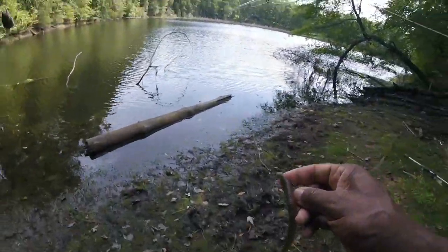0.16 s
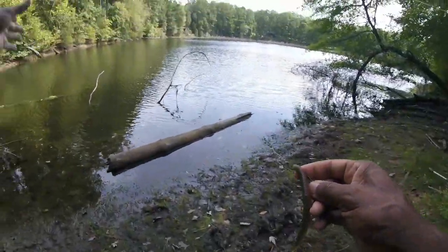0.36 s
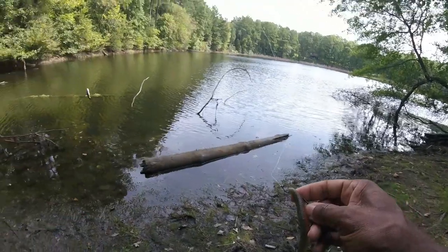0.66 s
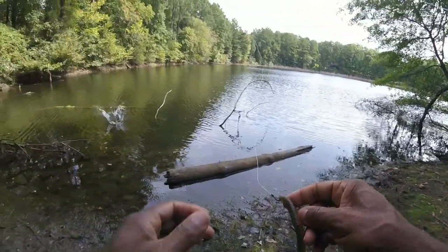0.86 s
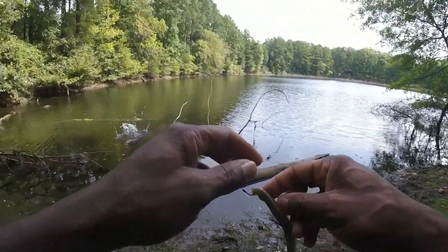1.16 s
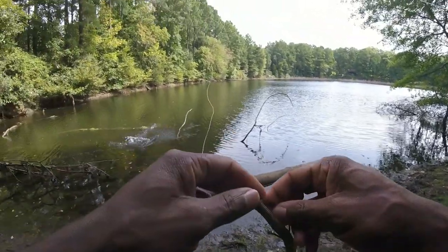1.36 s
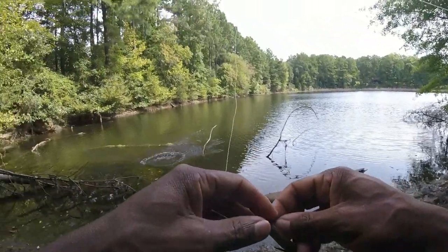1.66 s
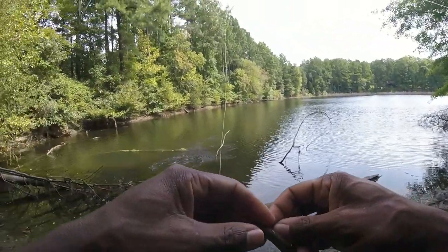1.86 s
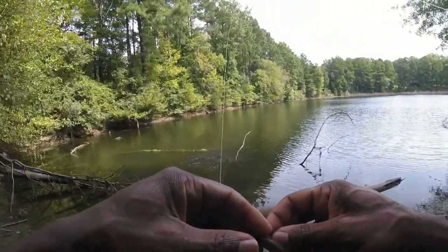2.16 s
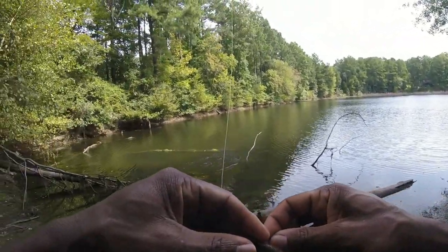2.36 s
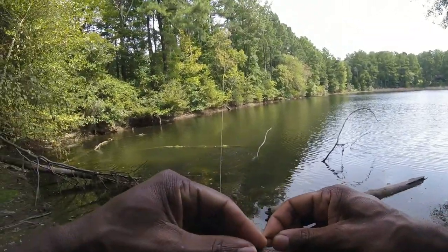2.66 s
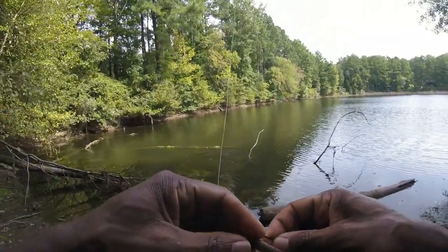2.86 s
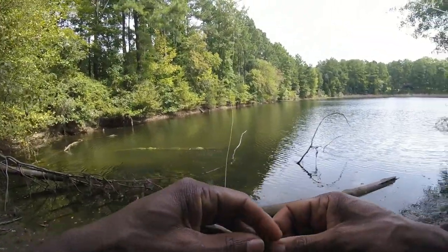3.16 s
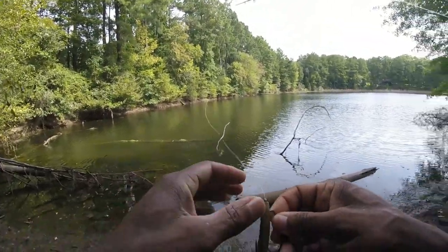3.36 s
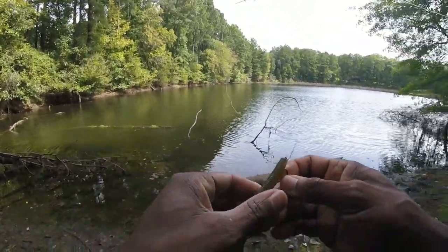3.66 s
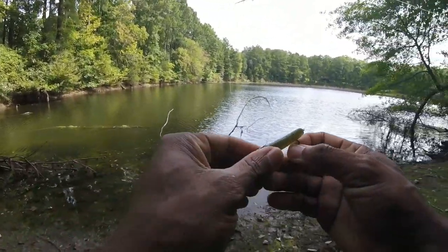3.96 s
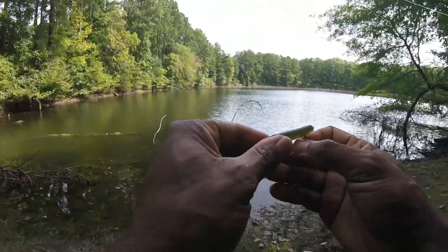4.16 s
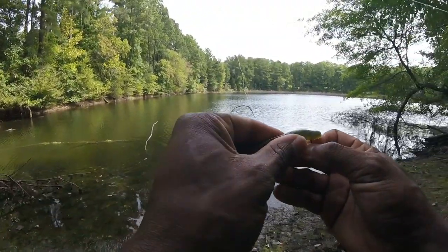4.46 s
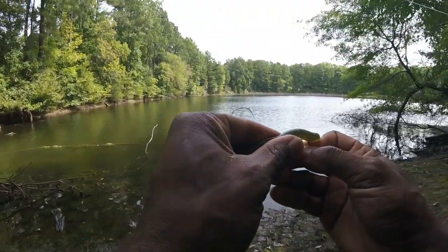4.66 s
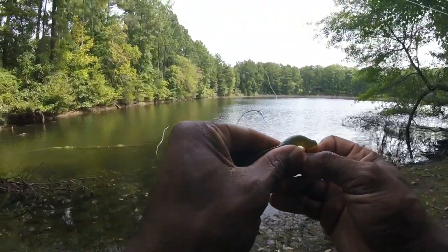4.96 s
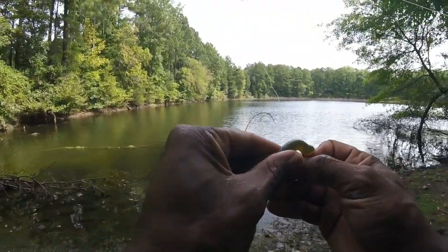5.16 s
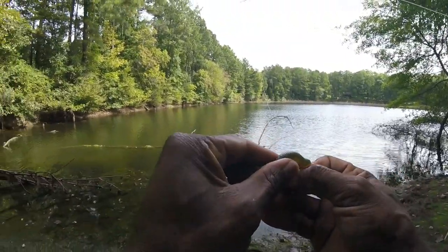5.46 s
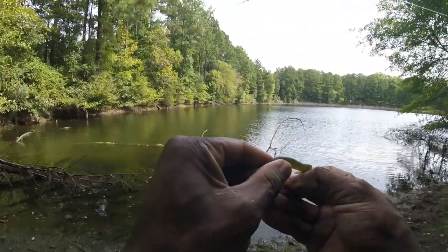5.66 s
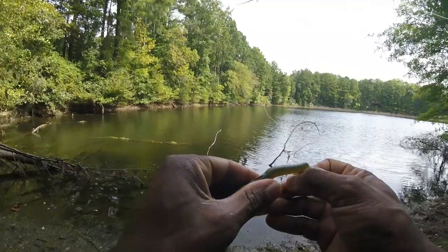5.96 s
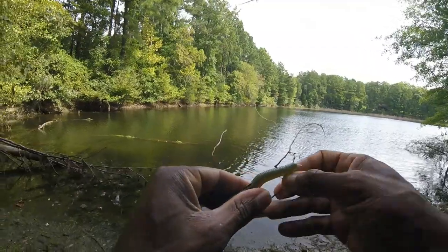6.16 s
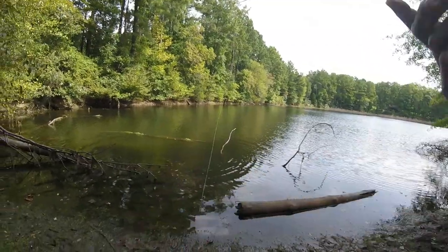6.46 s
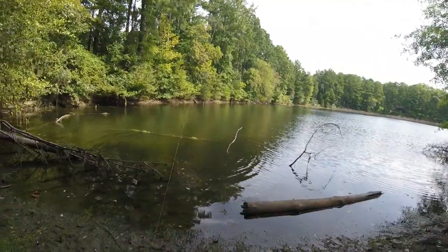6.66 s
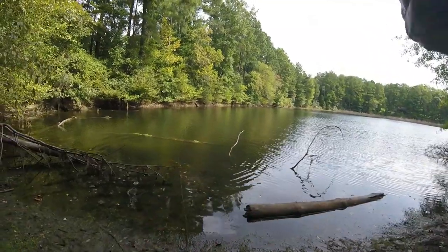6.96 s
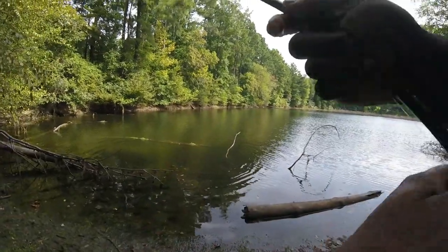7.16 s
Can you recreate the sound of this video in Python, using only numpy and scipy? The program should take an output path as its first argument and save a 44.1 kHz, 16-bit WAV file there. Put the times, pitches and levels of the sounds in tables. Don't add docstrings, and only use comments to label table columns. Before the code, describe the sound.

At a quiet pond, a near cricket pulses about ten times a second over a faint insect chorus, low air rumble and far engine hum. A sleeve swishes, then a short splash smacks with bubbles, pings and falling drops. Light finger ticks follow, with a deep bump. The middle is mostly cricket, then dull thumps strike the chest-worn microphone near the end.

```python
import sys
import numpy as np
from scipy import signal
from scipy.fft import rfft, irfft, next_fast_len
from scipy.io import wavfile
from scipy.ndimage import uniform_filter1d

SR = 44100
rng = np.random.default_rng(int(sys.argv[2]) if len(sys.argv) > 2 else 0)


def amplitude_ratio(level_db):
    exponent = np.asarray(level_db, float) / 20
    return 10 ** exponent


def generate_wav(sig):
    pcm = np.round(np.clip(np.atleast_2d(sig).T, -1, 1) * 32767).astype(np.int16)
    wavfile.write(sys.argv[1], SR, pcm)


N = 322635

# pitch_hz, level_db
AIR_COLOUR = [(20, -18), (55, -1), (100, -3.5), (200, -9.5), (400, -16), (900, -18.5), (1400, -26.5),
              (2500, -29), (4300, -33), (6000, -29), (9300, -36.5), (10300, -40.5), (11500, -38.5),
              (13400, -40.5)]
AIR_DB = -50
# peak_s, level_db, rise_s, fall_s
GUSTS = [(.26, -40, .17, 0.07), (1.49, -40, 0.12, 0.2), (2.14, -34, 0.043, 0.037), (2.5, -44, .07, .08),
         (2.69, -41, 0.098, .05), (2.83, -45, .06, .12), (3.24, -45, .14, .11), (4.13, -55, 0.27, .07),
         (5.2, -52, .12, .3), (5.93, -41.5, 0.39, .3), (7.13, -43, .1, .22)]
CALM_DB = -61
# peak_s, level_db, rise_s, fall_s
PASSES = [
    (0, -57, .3, 0.36),
    (1.04, -54, .45, 1.3),
    (4.03, -53, 0.18, .2),
]
ROAD_DB = -61
# multiple_of_engine_pitch, level_db
ENGINE_TONES = [(2, -64), (3, -54), (4, -53.5), (5, -63), (6, -66)]
ENGINE_HZ = 19.0
# time_s, level_db
HIGH_TONE_LEVEL = [(0, -48), (.28, -61), (.35, -52.5), (1.61, -51.5), (2.06, -76.5), (2.16, -54.5), (3.34, -53),
                   (3.75, -71), (4.01, -56), (4.95, -80), (5.11, -60.5), (6.72, -53.5), (7.2, -80)]
HIGH_TONE_HZ, HIGH_TONE_CLIMB_HZ_PER_S = 132.2, 0.38
# pitch_hz, spread_hz
CROWDS = [(5330, 70), (5620, 40), (5750, 40), (5900, 60), (6090, 15), (6450, 80), (6650, 120)]
CROWD_DB = [-74, -73, -80.5, -75, -91, -72, -73]
# first_s, last_s, beat_s, pitch_hz, level_db
PHRASES = [
    (1.72, 2.19, .0929, 5345, -68),
    (2.276, 2.86, 0.11, 5400, -63),
    (2.34, 2.75, 0.23, 6130, -62),
    (4.076, 4.37, 0.09, 5340, -65),
    (4.465, 4.68, .1015, 5300, -62),
    (4.847, 5.07, .1065, 5290, -61),
    (5.652, 5.69, .024, 6550, -60),
]
PHRASE_EDGE_DB = 2
# time_s, lateness_ms, level_db, partner_db (against
SINGER = [(0, 19, -68, -20), (.23, 19, -59, -20), (.5, 20, -59, -20), (.8, 20, -54, -18),
          (1.25, 17.5, -58, -12), (1.7, 22, -55.5, -10), (2.2, 24, -55, -12), (2.9, 26, -54, -16),
          (3.6, 22, -51.5, -15), (4.2, 21, -54.5, -9), (4.6, 19, -54, -7), (4.95, 14, -58.5, -5),
          (5.4, 21, -53, -6), (5.9, 18, -53, -12), (6.4, 17.4, -56.5, -10), (7.32, 20, -55.5, -4)]
STROKE_S = .09635
UNEVEN_MS, UNEVEN_DB = 1.2, 1.2
# peak_s, level_db, rise_s, fall_s, brightness_db
SWISHES = [(.085, -43.5, 0.072, 0.043, -15), (.58, -57, .1, 0.065, -17), (.834, -50.5, .003, 0.018, 2),
           (.861, -51, 0.011, 0.017, -2), (.9, -63.5, .05, .95, -3), (.92, -59, .025, 0.028, -4.5),
           (1.011, -56, 0.0044, .012, -12), (1.033, -45, .003, .008, -3.5), (1.046, -50, .006, 0.012, -9),
           (1.39, -65.5, 0.027, 0.033, 4), (1.3, -70, .08, 0.055, -8), (1.5, -57, 0.042, 0.048, -5),
           (2.129, -57, .004, 0.033, -16), (2.25, -69, 0.07, 0.079, -12), (3.97, -69, 0.09, 0.09, 7),
           (4.55, -73, .07, 0.045, 2), (5.67, -66, .03, .03, 1), (6.93, -70, 0.23, .05, -3)]
FIDGET_DB, FIDGET_BRIGHT_DB = -72.5, -6
# pitch_hz, width_hz, level_db
RUSTLE_MODES = [(450, 210, -0.5), (1100, 420, -1.5), (2510, 1340, 4), (3840, 2600, -0.5)]
# start_s, level_db, centre_hz, t60_s (time to fade by 60 dB)
TICKS = [(.8335, -29, 5960, 0.013), (0.8414, -21, 3900, .004), (.855, -43, 5000, .01),
         (0.858, -26, 3960, 0.011), (0.862, -43, 3000, .01), (0.9174, -44, 3500, 0.0096),
         (1.0097, -37, 3000, .006), (1.032, -24, 3080, 0.0073), (1.034, -31, 4500, .006),
         (1.038, -39, 3000, 0.01), (1.0445, -30, 3500, 0.014), (1.05, -45, 3000, .01),
         (1.231, -40, 3000, .006), (1.318, -40, 3500, .006), (1.2966, -37, 4300, .005),
         (1.3448, -44, 4000, .005), (1.3798, -34, 5600, 0.0042), (1.4002, -32, 5500, 0.0075),
         (1.4094, -49, 6700, 0.0046), (1.466, -43, 3000, 0.0056), (1.49, -46, 3500, 0.0068),
         (1.511, -41, 5000, .01), (1.65, -37, 6000, 0.0052), (2.126, -39, 3500, 0.013),
         (2.146, -44, 3500, 0.0087), (3.654, -39, 3800, 0.0066), (3.83, -38, 4440, 0.017),
         (4.04, -47, 4480, 0.0045), (4.548, -51, 4980, 0.0093), (6.9296, -35, 4220, 0.0064)]
# start_s, level_db, pitch_hz
BUMPS = [
    (1.478, -21.5, 58),
    (1.563, -40, 110),
    (2.13, -30, 52),
    (5.7273, -28, 139),
    (5.734, -23, 74.76),
    (5.872, -27, 54.83),
    (5.915, -27, 60.3),
    (6.035, -27, 55),
    (6.202, -33, 64.5),
]
# start_s, level_db, pitch_hz, t60_s, rise_per_s
BUBBLES = [(0.8407, -33, 606, 0.0098, 1), (.848, -22.5, 980, 0.0097, 5), (.859, -32.5, 650, 0.016, 5),
           (.918, -26, 686, 0.017, 5.5), (.98, -39.5, 524, 0.11, 1.2), (1.001, -29.5, 367, 0.14, 1.1),
           (1.0095, -30.5, 477, 0.025, 4), (1.033, -30, 400, 0.026, 3), (1.04, -37, 1100, 0.036, 1),
           (1.058, -29.5, 800, 0.014, 5), (1.21, -46.5, 670, 0.076, 1.3), (1.405, -46, 404, 0.048, 2),
           (1.405, -42, 1000, 0.022, 3), (1.455, -40, 850, .02, 3), (1.475, -38, 1070, 0.02, 3),
           (1.495, -37, 424, 0.045, 2), (1.515, -39, 438, 0.1, 10.8), (1.538, -40.5, 700, 0.038, 10),
           (1.697, -40.5, 361, 0.12, 1), (1.75, -38.5, 450, 0.031, 1.8), (2.078, -33, 380, 0.022, 2),
           (5.753, -31.5, 401, 0.013, 1)]
# start_s, level_db, pitch_hz, t60_s
PINGS = [(0.833, -23.5, 2200, 0.011), (0.8586, -38, 3140, 0.015), (0.8614, -43, 1970, 0.015),
         (0.9173, -46, 2320, 0.015), (1.0024, -37, 2040, 0.015), (1.0091, -32, 2410, 0.012),
         (1.0306, -24, 2130, 0.012), (1.0444, -36, 2060, 0.015), (1.048, -46.5, 3340, 0.015),
         (1.2296, -50, 2260, 0.015), (1.2645, -42, 3430, 0.015), (1.2955, -38, 3600, 0.013),
         (1.3437, -39, 2640, 0.016), (1.3894, -48, 2630, 0.015), (1.4381, -43, 2100, 0.015),
         (1.4641, -34, 2410, 0.013), (1.49, -22, 2700, 0.0082), (1.5105, -36, 2010, 0.013),
         (1.5594, -45, 2200, 0.015), (1.7933, -49, 2600, 0.015), (2.1262, -34, 2800, 0.02),
         (2.1324, -43, 2200, 0.015), (2.1454, -41, 2680, 0.015), (2.2483, -44, 2820, 0.015),
         (6.878, -47, 1770, 0.025), (2.126, -46, 4700, .01), (6.938, -47, 1500, .02),
         (2.255, -48, 2300, .012), (1.265, -45, 2550, .015)]
SPATTER_START_S, SPATTER_END_S, SPATTER_DB = .84, 1.7, -14
# pitch_hz, share
TREBLE_GATE = [(8400, 0), (9300, 1.1), (10300, 2.8), (11300, 2.2), (13300, 2.6), (13500, 4.3), (14000, 5.0)]


def spectral(x, gain):
    size = next_fast_len(N)
    f = np.arange(size // 2 + 1) * SR / size + 1e-3
    return irfft(rfft(x, size) * gain(f), size)[:N]


def hiss(hz, width):
    size = next_fast_len(N)
    f = np.arange(size // 2 + 1) * SR / size
    noise = rng.standard_normal(2 * len(f)).view(complex)
    x = irfft(noise * np.exp(-((f - hz) / width) ** 2), size)[:N]
    return x / np.std(x)


def walk(rate):
    k = int(SR / rate)
    held = np.repeat(rng.standard_normal(N // k + 1), k)
    return 0.99 * uniform_filter1d(uniform_filter1d(held, k), k)[:N]


def curve(table):
    s, *columns = np.transpose(table)
    return [np.interp(np.arange(N) / SR, s, c) for c in columns]


def swells(table, rest_db):
    t = np.arange(0, N / SR, .001)
    gain = amplitude_ratio(rest_db)
    for s, db, rise, fall in table:
        width = np.where(t < s, rise, fall)
        gain = gain + amplitude_ratio(db) * np.exp(-((t - s) / width) ** 2)
    return np.interp(np.arange(N) / SR, t, gain)


def add(out, s, db, wave):
    i = max(int(s * SR), 0)
    wave = wave[:max(N - i, 0)]
    out[i:i + len(wave)] += amplitude_ratio(db) * wave


def ring(hz, t60, rise, attack=0.0016):
    t = np.arange(int(t60 * SR)) / SR
    fade = np.minimum(t / attack, 1) * 1000. ** (-t / t60)
    return fade * np.sin(2 * np.pi * hz * t * (1 + rise * t / 2))


def chirp(hz, length, fall):
    t = np.arange(int(length * SR)) / SR
    tone = np.sin(2 * np.pi * hz * t * (1 + fall * (.5 - t / length / 2)))
    return np.sin(np.pi * t / length) * tone


def air():
    out, swell = 0, walk(0.14)
    for hz in 20 * 2 ** np.arange(0, 9.5, 1 / 3):
        calm = 1 / (1 + (hz / 5000) ** 2)
        flicker = amplitude_ratio(calm * (0.16 * swell + 0.97 * walk(4.02)))
        out = out + np.sqrt(hz) * flicker * hiss(hz, hz / 5)
    hz, db = np.transpose(AIR_COLOUR)
    out = spectral(out, lambda f: amplitude_ratio(np.interp(np.log(f), np.log(hz), db)))
    wind = amplitude_ratio(-9.0) * swells(GUSTS, CALM_DB) * hiss(38, 24)
    tyres = amplitude_ratio(-9.5) * swells(PASSES, ROAD_DB) * hiss(730, 160)
    return amplitude_ratio(AIR_DB) * out / np.std(out) + wind + tyres


def machines():
    turn = 2 * np.pi * np.cumsum(ENGINE_HZ * (1 + 0.0033 * walk(0.99))) / SR
    engine = sum(amplitude_ratio(db + 2.0 * walk(1.32)) * np.sin(k * turn + k * k) for k, db in ENGINE_TONES)
    high_hz = HIGH_TONE_HZ + HIGH_TONE_CLIMB_HZ_PER_S * np.arange(N) / SR
    high_tone = amplitude_ratio(curve(HIGH_TONE_LEVEL)[0]) * np.sin(2 * np.pi * np.cumsum(high_hz) / SR)
    return np.sqrt(2) * (engine + high_tone)


def far_chorus():
    out = np.zeros(N)
    for (hz, spread), db in zip(CROWDS, CROWD_DB):
        crowd = np.zeros(N)
        for t, (a, b) in zip(rng.random(1300) * N / SR, rng.standard_normal((1300, 2))):
            add(crowd, t, 1.4 * b, chirp(hz + spread * a, 0.041, 0.0036))
        out += amplitude_ratio(db) * crowd / np.std(crowd)
    return out


def crickets():
    out = np.zeros(N)
    for first, last, step, hz, db in PHRASES:
        for t in np.arange(first, last, step):
            edge = abs(2 * (t - first) / (last - first) - 1)
            add(out, t - .014, db + PHRASE_EDGE_DB * edge, chirp(hz, 0.034, 0.024))
    beat = np.arange(0, N / SR, STROKE_S)
    s, *controls = np.transpose(SINGER)
    late, level, upper = (np.interp(beat, s, c) for c in controls)
    for k, (a, b, c, d) in enumerate(rng.standard_normal((len(beat), 4))):
        t = beat[k] + (late[k] + UNEVEN_MS * c) / 1000
        db = level[k] + UNEVEN_DB * d
        add(out, t - .015, db - 2.0, chirp(5438 + 10 * a, 0.029, .014 + .007 * b))
        add(out, t - .017, db + upper[k] + 1.66 * b, chirp(5610 + 15 * b, 0.02, 0.018))
    return out * amplitude_ratio(1.6 * walk(250))


def motion():
    return swells([row[:-1] for row in SWISHES], FIDGET_DB)


def rustle():
    bright_swishes = [(s, db + b, rise, fall) for s, db, rise, fall, b in SWISHES]
    bright = swells(bright_swishes, FIDGET_DB + FIDGET_BRIGHT_DB)
    grain = amplitude_ratio(1.54 * walk(250) + 0.49 * walk(40))
    body = sum(amplitude_ratio(db) * hiss(hz, width) for hz, width, db in RUSTLE_MODES)
    return grain * (motion() * body / np.std(body) + bright * hiss(5770, 2570))


def handling():
    out = np.zeros(N)
    t = np.arange(600) / SR
    for (s, db, hz, t60), noise in zip(TICKS, rng.standard_normal((len(TICKS), 600))):
        band = signal.butter(2, [.4 * hz, 1.7 * hz], "band", fs=SR)
        edge = t == 0
        crack = signal.lfilter(*band, edge + 0.18 * noise * 1000. ** (-t / t60))
        add(out, s, db, -crack / np.abs(crack).max())
    for s, db, hz in BUMPS:
        add(out, s, db, ring(hz, 2.7 / hz, 0, attack=0.245 / hz))
    return out


def spatter():
    out = np.zeros(N)
    for when, pitch, size in rng.random((450, 3)):
        hz = 1800 * 2.4 ** pitch
        s = SPATTER_START_S + when * (SPATTER_END_S - SPATTER_START_S)
        add(out, s, -2.5 * np.log(size), ring(hz, 14 / hz, 8, attack=0.00024))
    return motion() * amplitude_ratio(SPATTER_DB) * out / np.std(out)


def splash():
    out = np.zeros(N)
    for s, db, hz, t60, rise in BUBBLES:
        add(out, s, db, ring(hz, t60, rise, attack=0.0015))
    for (s, db, hz, t60), noise in zip(PINGS, rng.standard_normal((len(PINGS), 2048))):
        puff = uniform_filter1d(noise, size=6)[:int(t60 * SR)]
        add(out, s, db, ring(hz, t60, 7.0) * (1 + 0.22 * puff))
    return out


def scene():
    cover = signal.butter(2, 6500, fs=SR, output="sos")
    near = signal.sosfilt(cover, handling() + spatter() + splash())
    mono = air() + machines() + far_chorus() + crickets() + rustle() + near
    return np.array([mono, mono])


def lost_treble(x):
    hop = 1024
    n, k = np.arange(2 * hop), np.arange(380, 700)
    window = np.sin(np.pi * (n + .5) / (2 * hop))
    basis = window * np.cos(np.pi / hop * np.outer(k + .5, n + .5 + hop / 2))
    blocks = np.pad(x, (hop, 2 * hop - N % hop)).reshape(-1, hop)
    lines = np.hstack([blocks[:-1], blocks[1:]]) @ basis.T
    share = np.interp(k * SR / 2 / hop, *np.transpose(TREBLE_GATE))
    limit = np.median(np.abs(lines), axis=0) * share
    frames = 2 / hop * (lines * (np.abs(lines) < limit)) @ basis
    return (frames[:-1, hop:] + frames[1:, :hop]).ravel()[:N]


def band_limit(x):
    return signal.sosfilt(signal.butter(12, 13910, fs=SR, output="sos"), x)


def record(dry):
    mix = dry - lost_treble(dry[0])
    return band_limit(mix)


dry = scene()
out = record(dry)
generate_wav(out)
```